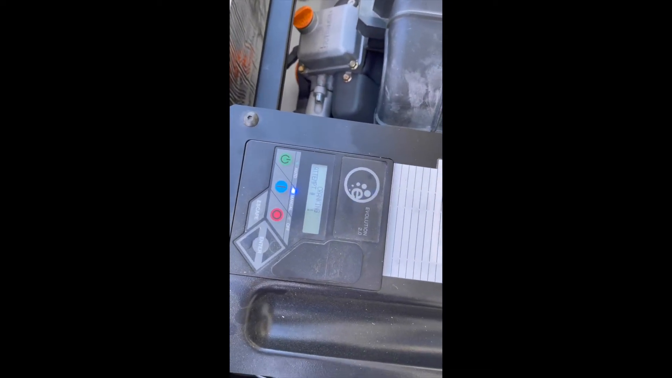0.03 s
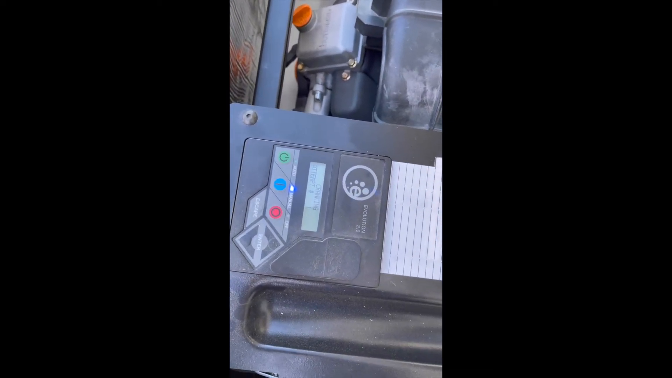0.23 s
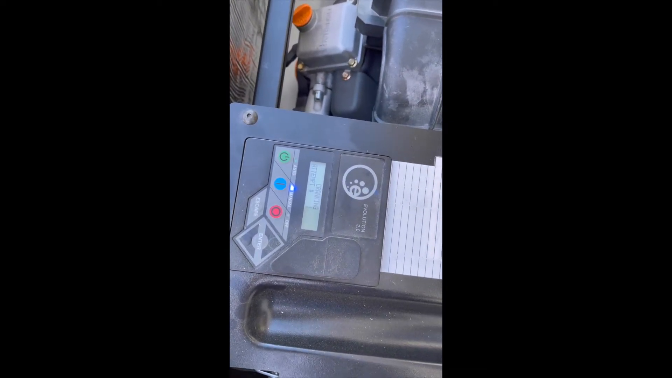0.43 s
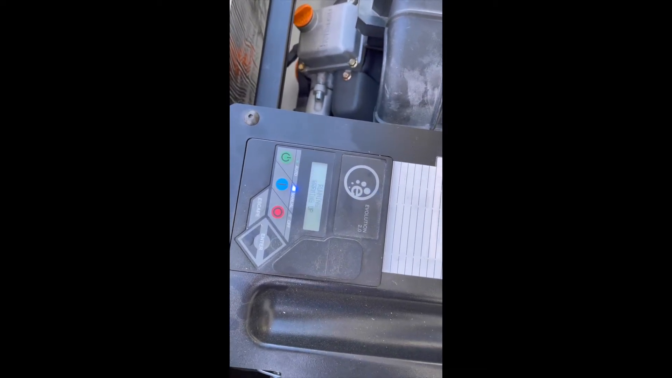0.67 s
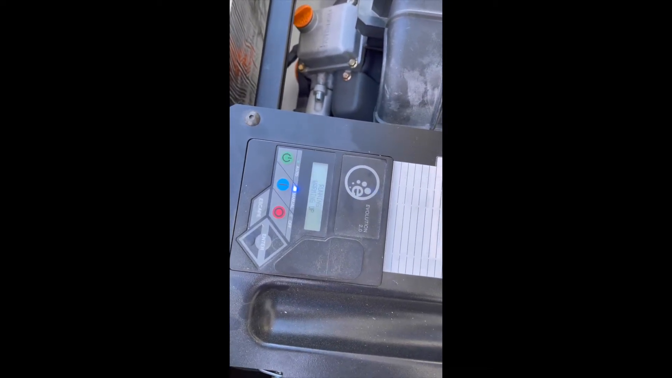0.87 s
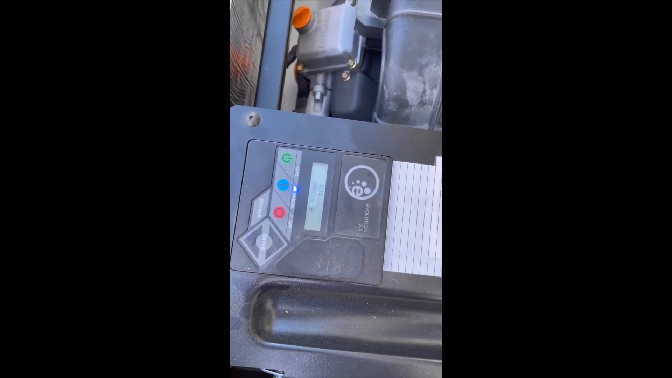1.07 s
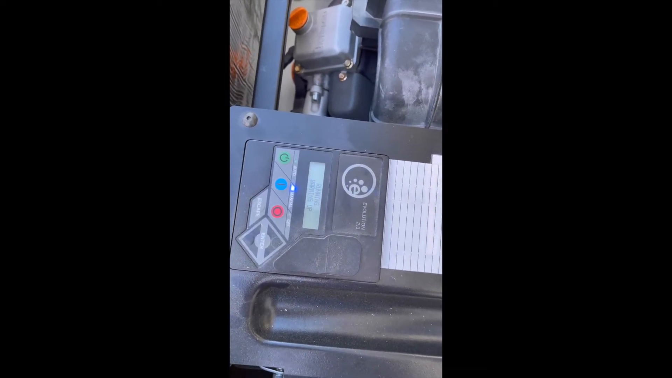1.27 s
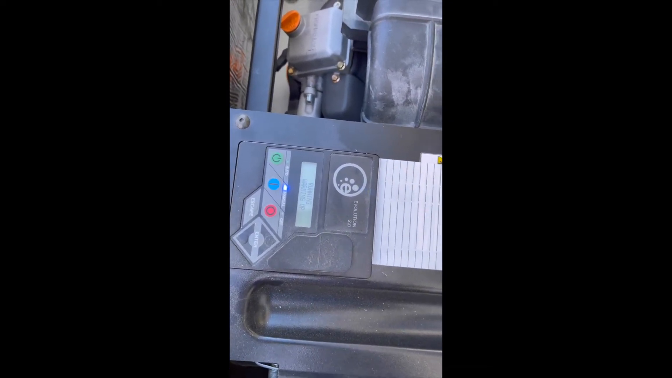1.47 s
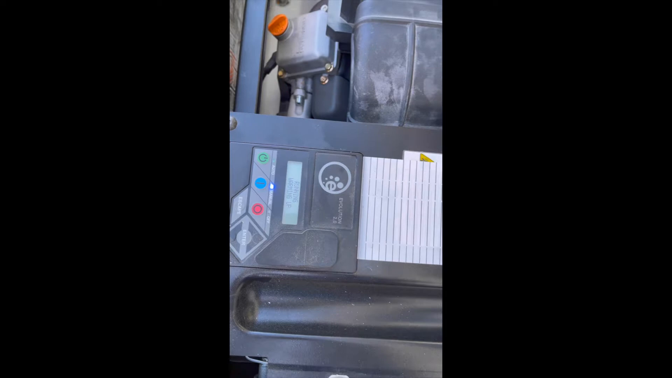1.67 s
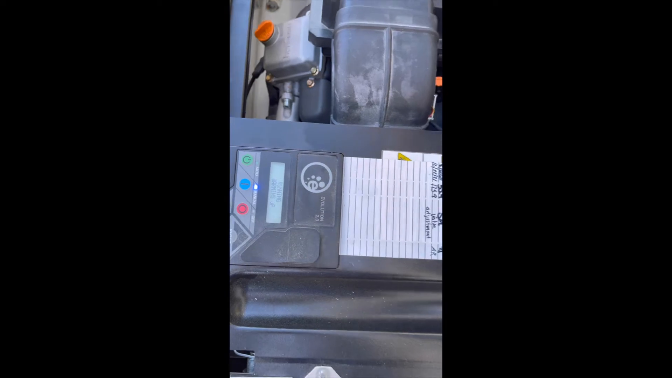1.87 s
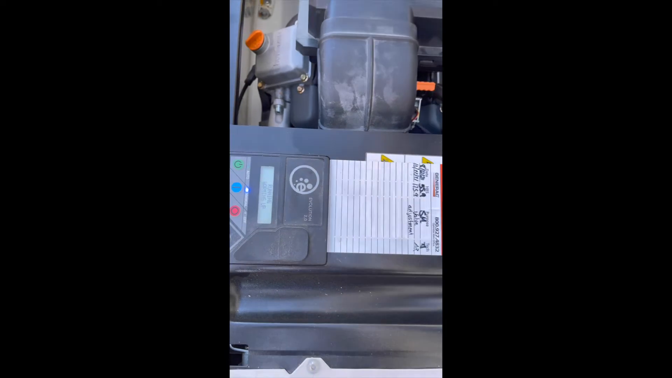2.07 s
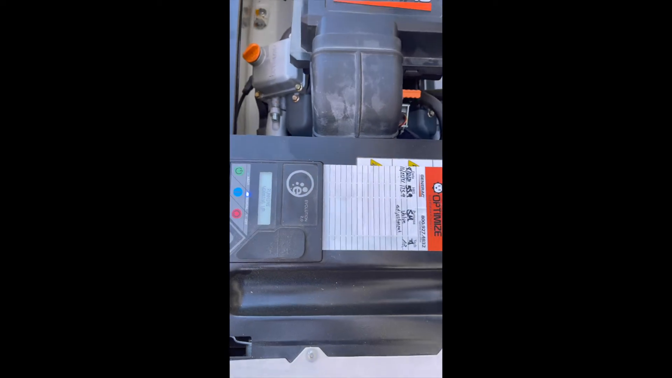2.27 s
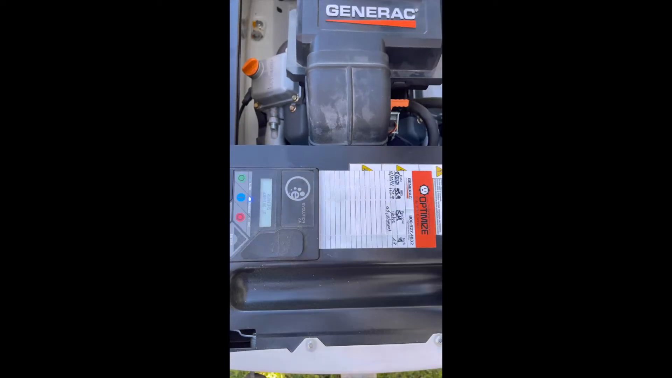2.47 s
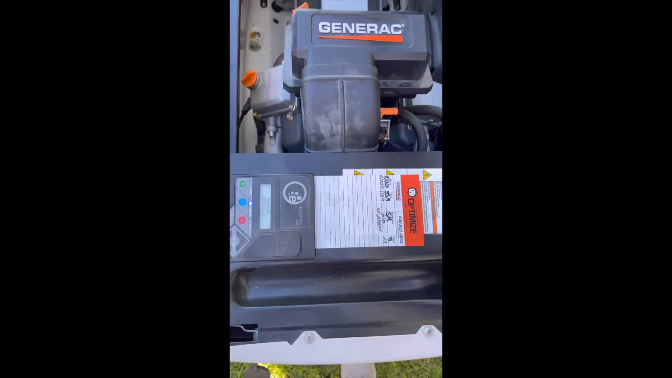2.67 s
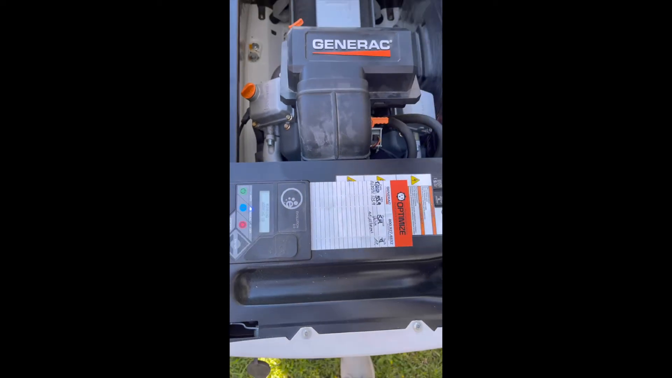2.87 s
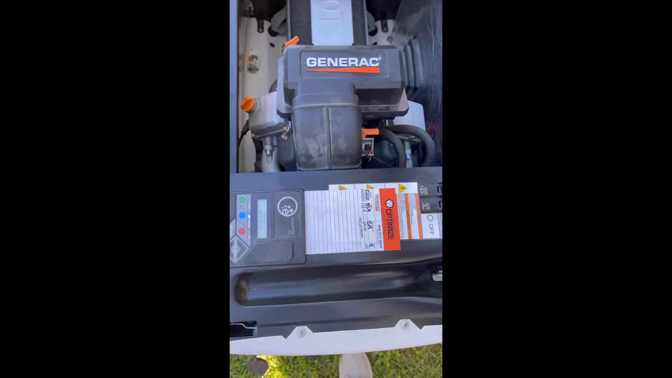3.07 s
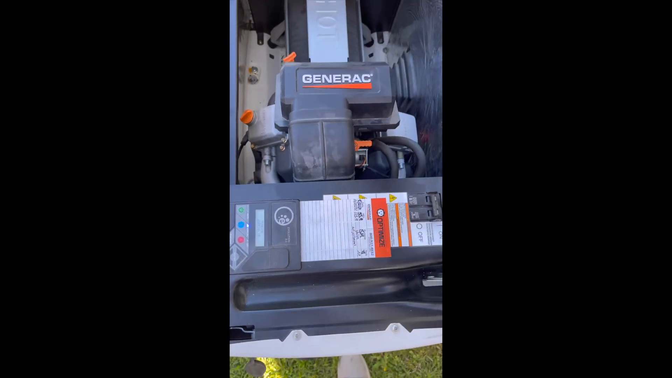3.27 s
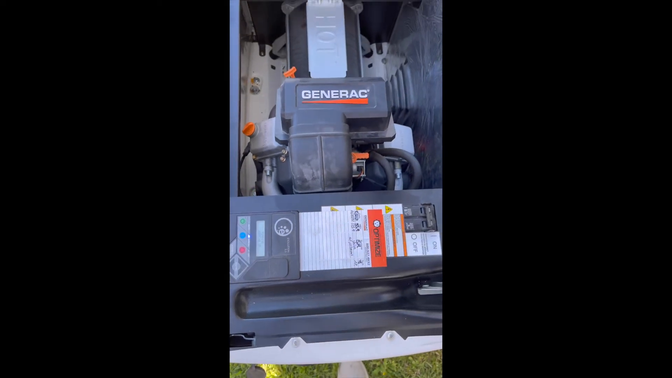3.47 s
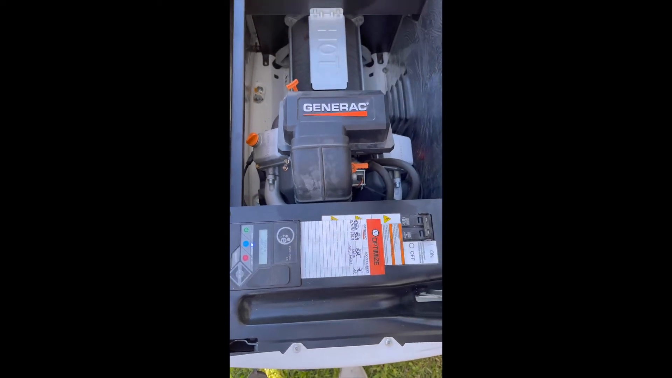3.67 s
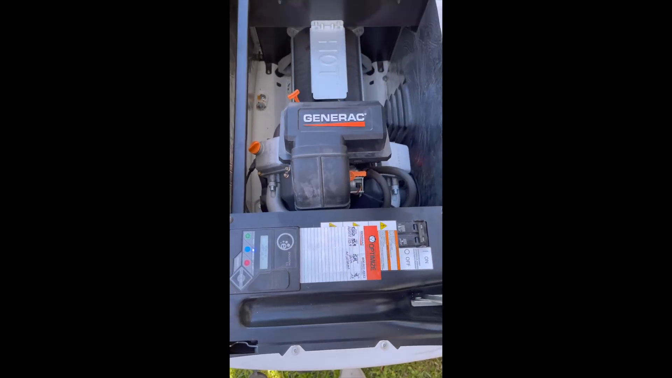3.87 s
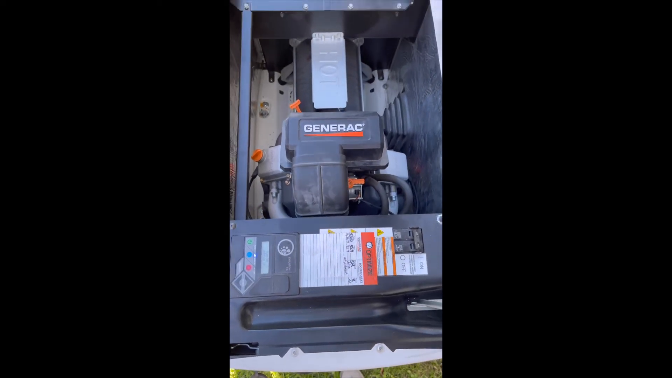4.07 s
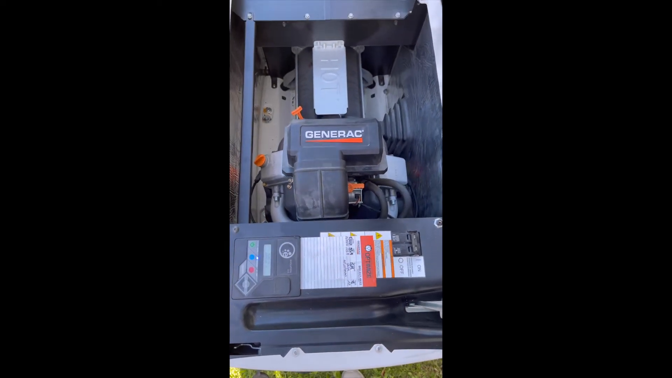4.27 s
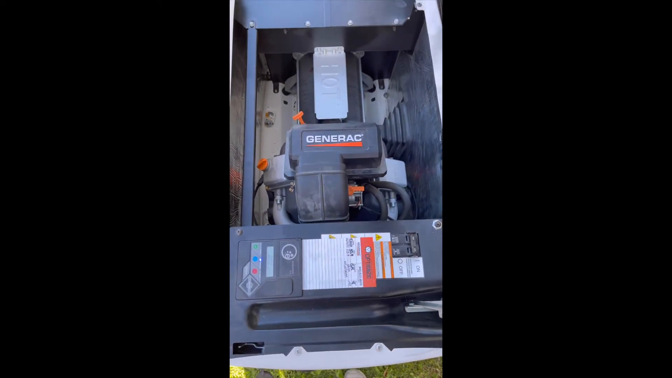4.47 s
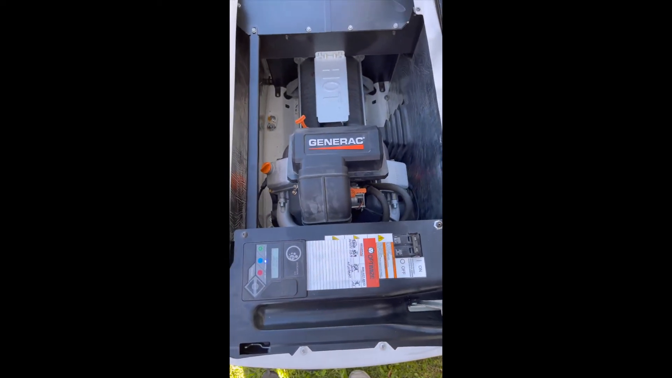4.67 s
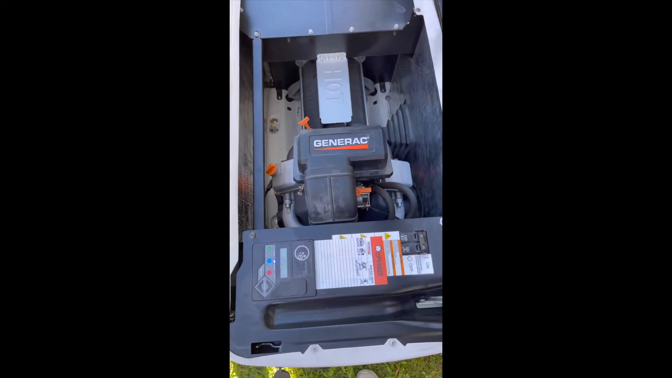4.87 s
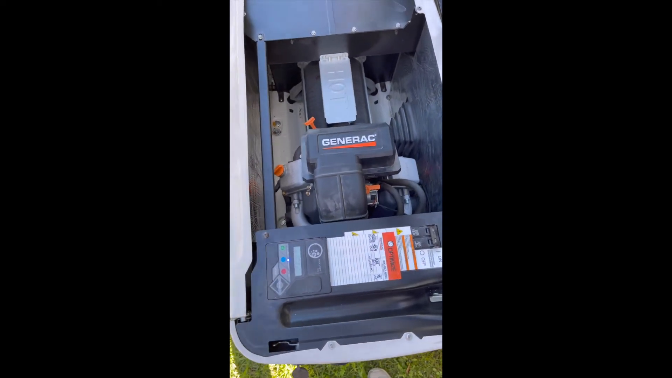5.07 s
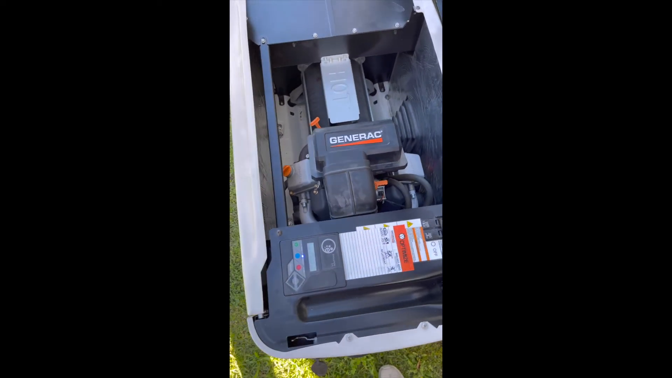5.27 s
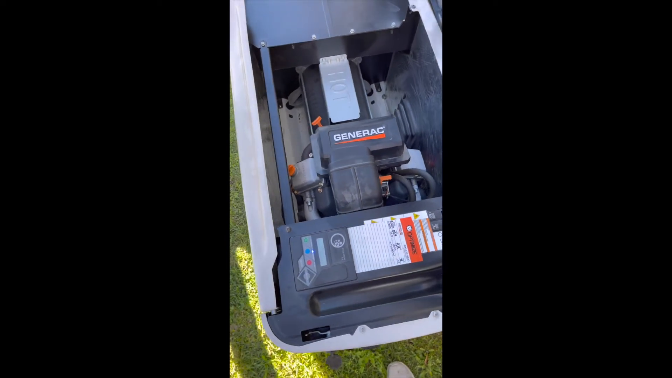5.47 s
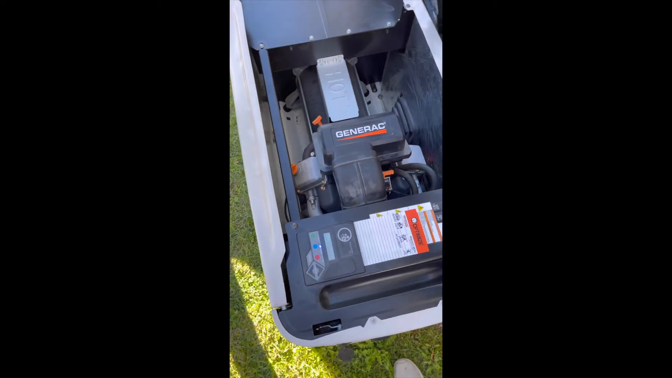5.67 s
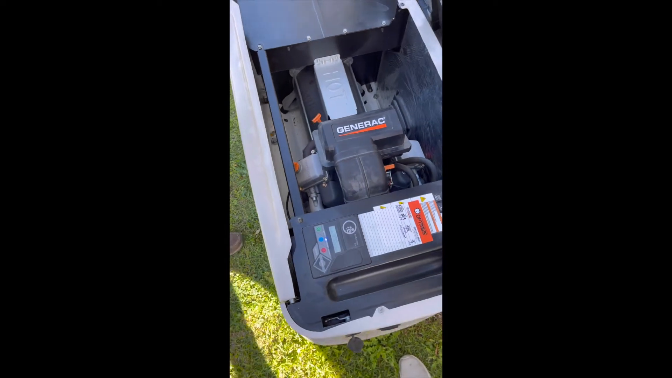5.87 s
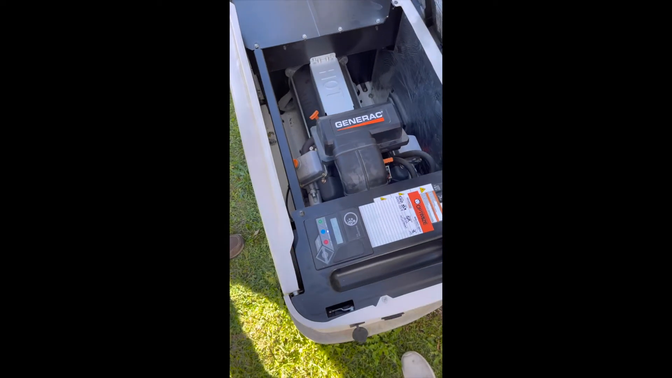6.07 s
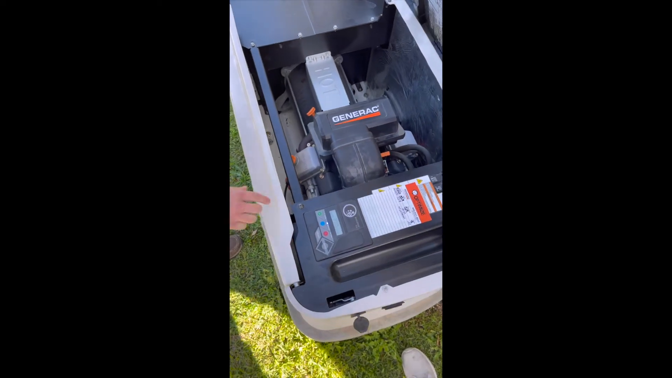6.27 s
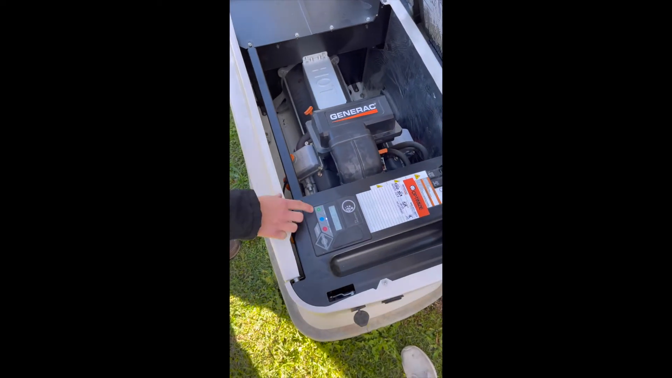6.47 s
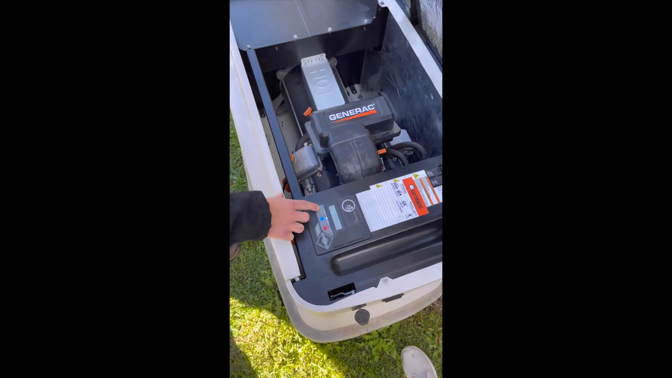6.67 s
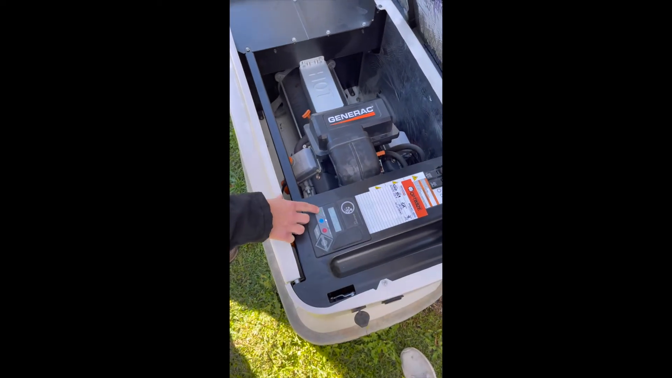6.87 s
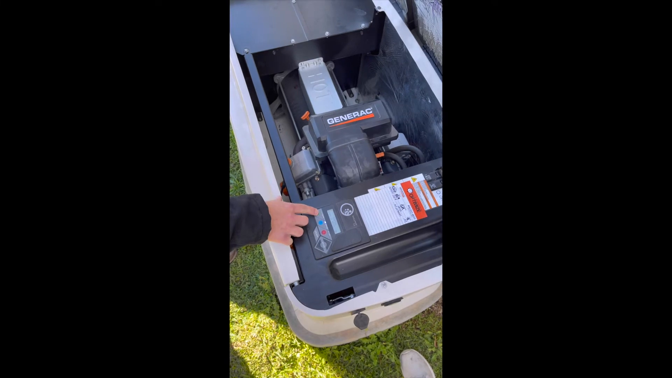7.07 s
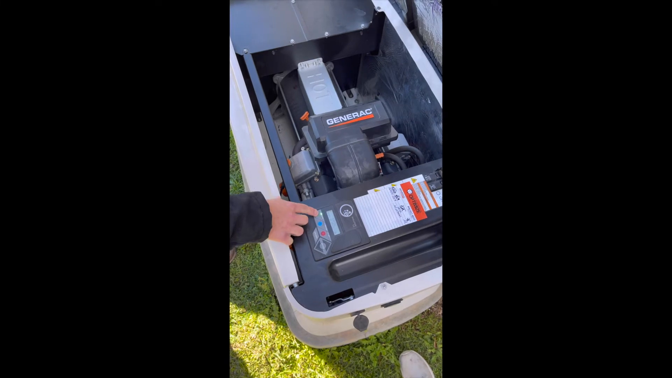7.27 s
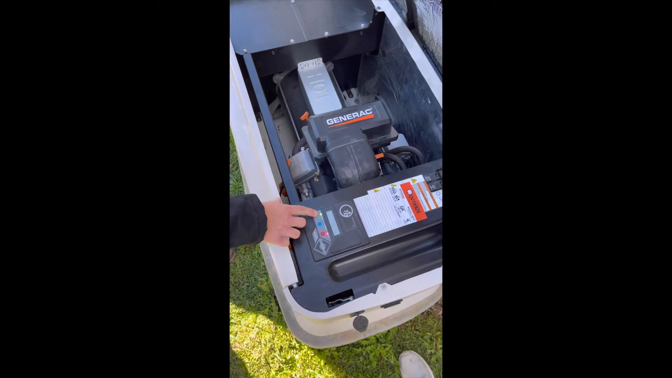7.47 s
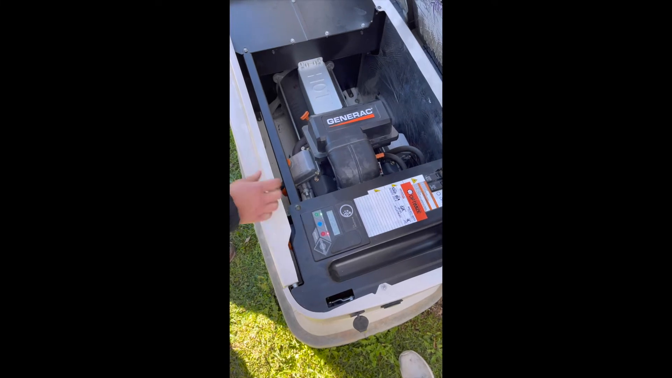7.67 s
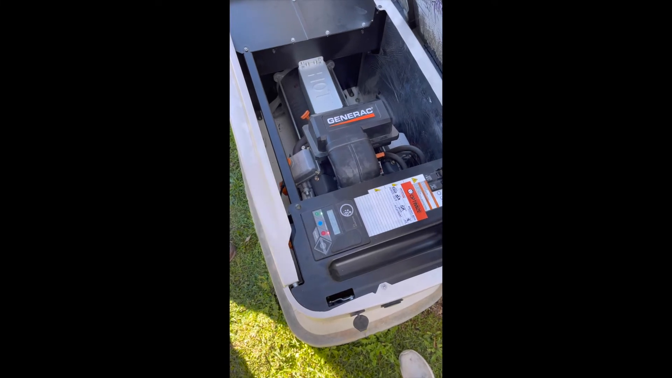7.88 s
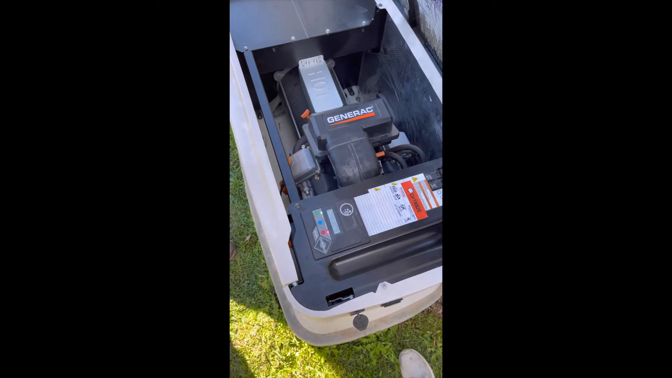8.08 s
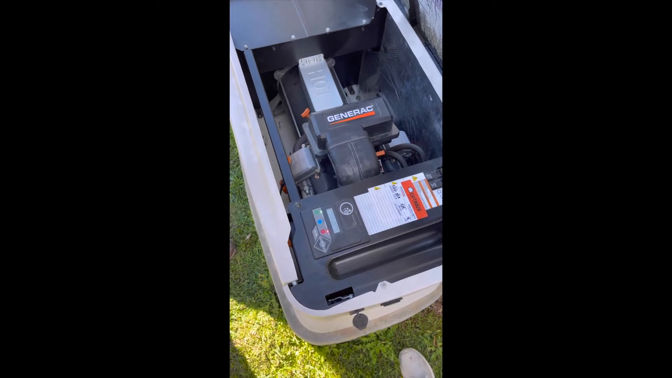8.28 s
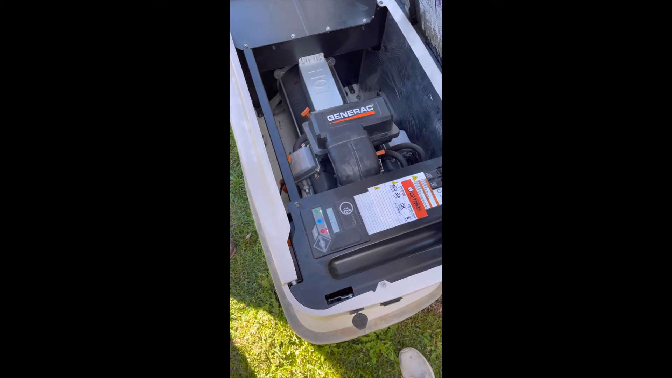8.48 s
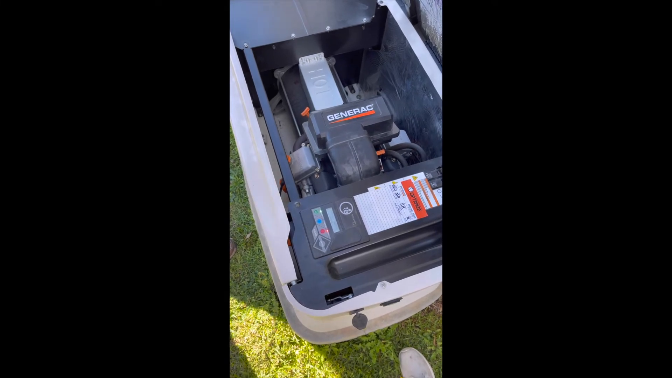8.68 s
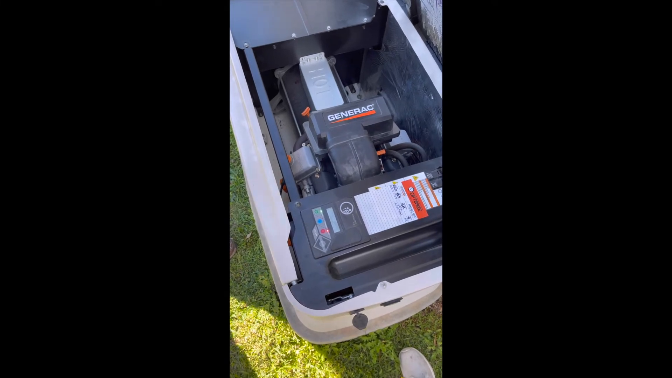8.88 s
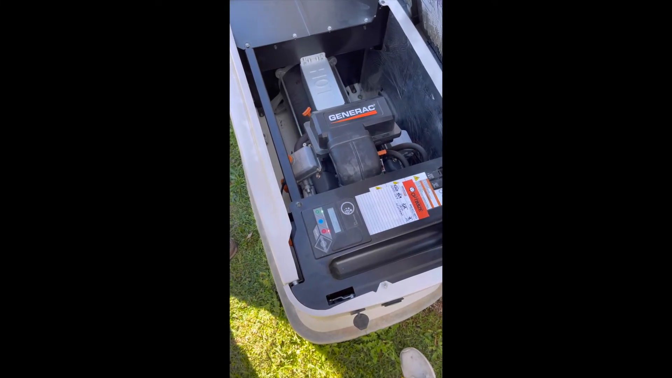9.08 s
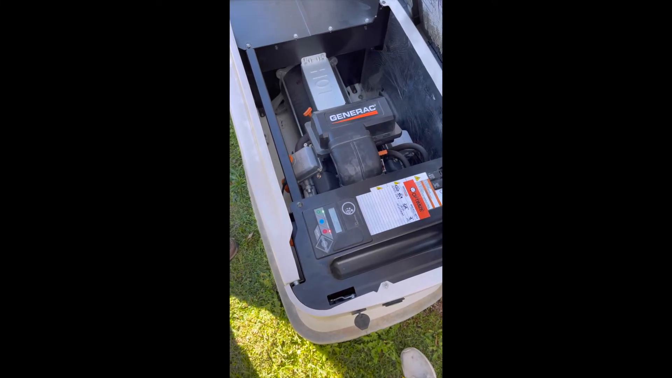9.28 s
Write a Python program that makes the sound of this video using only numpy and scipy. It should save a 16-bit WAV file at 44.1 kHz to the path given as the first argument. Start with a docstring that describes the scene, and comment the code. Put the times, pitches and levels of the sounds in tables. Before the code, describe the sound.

A small generator engine, already firing, speeds up inside an open steel box outdoors and settles into a steady drone. Rushing air roars and hisses around it, with a thin fan whine and rapid metallic valve ticks. The handheld microphone starts close and backs away, so the ticking softens. Near the end the engine is switched off and coasts, falling in pitch and fading with a low chug.

```python
"""An air-cooled twin engine in an open steel box on a lawn runs up to speed, is switched off, coasts down.
Firings and shaking panels drone on multiples of the four-stroke cycle, swelling through the box's
resonances. Air and exhaust roar in the box, the flywheel fan sings, valves tick and ring the head,
and the cowl hisses. We hear it from a handheld pair of microphone ports that backs away as it runs."""
import sys
import numpy as np
from scipy import signal
from scipy.fft import rfft, irfft
from scipy.io import wavfile
from scipy.ndimage import uniform_filter1d

SR = 44100
rng = np.random.default_rng(int(sys.argv[2]) if len(sys.argv) > 2 else 0)


def generate_wav(signal):
    """Clip the signal to [-1, 1] and save it as 16-bit WAV at the path in sys.argv[1]."""
    frames = np.transpose(np.atleast_2d(signal))
    scaled = np.clip(frames, -1, 1) * 32767
    pcm = np.round(scaled).astype(np.int16)
    wavfile.write(sys.argv[1], SR, pcm)


N = 411012
T = np.arange(N) / SR
HZ = np.fft.rfftfreq(N, 1 / SR)

# Levels are relative trims. A set of three means near, far (after backing away) and coasting.
BACK_AWAY_S = (1.0, 4.57)
START_HZ, GOVERNED_HZ, RUN_UP_S = 21.3, 30.137, 1.776  # cycle rates: half the shaft speed
OFF_S, COAST_S = 7.472, 2.49  # switch-off, time constant of the run-down
FIRING_DIES_S, SETTLE_S = .11, .86  # after switch-off: firings stop, moving parts settle


def engine_speed():
    """Cycles a second: the governor pulls the engine up, hunting a little; switched off, it runs down."""
    run_s = np.minimum(T, OFF_S)
    hunt = .15 * np.exp(-run_s / 3) * np.sin(2 * np.pi * run_s / 2.5)
    running = GOVERNED_HZ - (GOVERNED_HZ - START_HZ) * np.exp(-run_s / RUN_UP_S) + hunt
    return running * np.exp(-(T - run_s) / COAST_S)


# Body of the drone, and thin whines above it: (cycle multiple, near [dB], far [dB], coasting [dB])
DRONE_PARTIALS = [(2, -42, -40, -45), (3, -40, -39, -31.5), (4, -39, -40, -48), (5, -31, -43, -34),
                  (6, -29, -41, -42), (7, -42, -43, -48), (8, -31, -31, -39), (9, -40, -34, -45),
                  (10, -38, -35.5, -39), (11, -29, -44, -44), (12, -44, -36, -43), (13, -29.5, -45, -41),
                  (14, -33, -31, -51), (15, -39, -41, -48), (16, -28, -31, -37), (17, -40, -41, -52),
                  (18, -36, -38, -47), (19, -38, -40, -49), (20, -38, -36.5, -43), (22, -48, -42, -51),
                  (24, -38, -38, -41), (25, -45, -41, -52), (26, -42, -43, -56), (28, -42, -44, -48),
                  (30, -48, -39, -47), (32, -39, -46, -41), (36, -47, -45, -60), (38, -48, -47, -50)]
WHINE_PARTIALS = [(44, -50, -48, -54), (64, -50, -51, -52), (72, -48, -47, -54), (80, -46.5, -53, -56)]


def engine_drone(cycle, cycle_hz):
    """Firings and shaking panels. No two firings are alike, so partials waver, the higher ones more."""
    slowing = np.exp(-1.5 * np.maximum(T - OFF_S, 0) / COAST_S)  # falls as speed to the power 1.5
    drone = 0
    for k, *levels_db in DRONE_PARTIALS + WHINE_PARTIALS:
        waver_db = min(.05 * k, .4 + .025 * k) * walk(3) + min(.07 * k, 1.2) * walk(18)
        level = state_gain(levels_db, FIRING_DIES_S) * slowing * box_gain(k * cycle_hz) * undb(waver_db)
        if k * START_HZ < 120:  # the low end builds as the engine catches
            level *= undb(-16 * np.clip(1 - T / .5, 0, 1))
        phase = 2 * np.pi * (k * cycle + rng.random()) + min(.025 * k, .45) * walk(5)
        drone += np.sqrt(2) * level * np.sin(phase)
    # the drone dips as the listener drifts aside
    aside_db = np.interp(T, [5.8, 6.8, OFF_S, OFF_S + FIRING_DIES_S], [0, -1.8, -1.8, 0])
    return drone * undb(aside_db)


# Colour of the steel box: (frequency [Hz], gain [dB])
BOX_RESONANCES = [(40, -13), (55, -4), (70, -3), (115, -4), (150, 4), (171, 8), (180, 3), (210, -1),
                  (225, 6), (260, -10), (290, 6), (345, -3), (372, -8), (420, 2), (445, 6.5), (470, 4),
                  (482, -1), (520, -1), (710, 3), (800, -2), (900, 2), (1060, 7), (1110, -1), (1187, -3),
                  (1200, 5), (1230, 0)]


def box_gain(tone_hz):
    """A gliding partial swells through the box's resonances; coasting, it chugs as it passes the boom."""
    box_hz, box_db = np.transpose(BOX_RESONANCES)
    colour_db = np.interp(np.log(tone_hz), np.log(box_hz), box_db, right=0)
    coasting = np.clip((T - OFF_S) / SETTLE_S, 0, 1)
    chug_db = 5 * np.exp(-((tone_hz - 218) / 30) ** 2) * coasting
    return undb(colour_db + chug_db)


# Fader ride of the rushing air, shared with the cowl hiss: (time [s], level [dB])
AIR_RIDE = [(0, -23.5), (.4, -21.5), (2.8, -22), (3.5, -22.5), (5.1, -20), (5.8, -22.5), (6.6, -22),
            (7.45, -22), (8.3, -28.5), (8.8, -28.5), (9.32, -32)]
# Tone colour of the roar: (frequency [Hz], level [dB])
ROAR_EQ = [(45, -24), (90, -12.5), (140, -20), (200, -1.5), (300, -5.5), (480, -0.5), (700, -3), (1000, -6),
           (1250, -9.5), (1500, -55)]


def box_roar(cycle, cycle_hz):
    """Cooling air and exhaust rush in the box over a boom that outlasts them. Two unrelated streams."""
    flicker_db = .4 * walk(9)
    boom = shape(rng.standard_normal((2, N)), resonance(hz=223.5, width_hz=171))
    rush = shape(knocking_noise(cycle, cycle_hz, share=.15), eq_curve(ROAR_EQ))
    rush_level = state_gain((.5, -.5, -.5)) * undb(ride(AIR_RIDE) + flicker_db)
    return rush_level * rush + state_gain((-25, -33.5, -30.5)) * boom


def knocking_noise(cycle, cycle_hz, share):
    """Two noise streams; a share of their power is knock that returns each cycle and slowly changes."""
    steps, turn_likeness, cycle_likeness = 512, .5, .65
    fresh = rng.standard_normal((2, int(cycle[-1]) + 2, steps))
    other_turn = np.roll(fresh, steps // 2, axis=2)  # the shaft turns twice a cycle
    pattern = (fresh + turn_likeness * other_turn) / np.hypot(1, turn_likeness)
    pattern = signal.lfilter([np.sqrt(1 - cycle_likeness ** 2)], [1, -cycle_likeness], pattern, axis=1)
    knock = np.array([np.interp(cycle * steps, np.arange(row.size), row.ravel()) for row in pattern])
    knock *= np.sqrt(steps * cycle_hz / SR)
    return np.sqrt(share) * knock + np.sqrt(1 - share) * rng.standard_normal((2, N))


# Fader ride of the fan's note: (time [s], level [dB])
FAN_RIDE = [(0, -33), (.3, -29.5), (.8, -32), (1.2, -27.5), (1.9, -26.5), (2.3, -32), (2.8, -36),
            (3.1, -31.5), (3.9, -33), (5.2, -36.5), (5.9, -32), (6.3, -27.5), (7.45, -28), (7.6, -33),
            (7.8, -31), (7.9, -36), (8.0, -34), (8.1, -46), (8.3, -43), (8.8, -48), (8.87, -36),
            (8.94, -37), (9.0, -46), (9.25, -42), (9.32, -44)]


def flywheel_fan(cycle):
    """Twenty blades pass forty times a cycle and sing one slightly shivering note."""
    level = undb(ride(FAN_RIDE) + 1.1 * walk(20))
    return np.sqrt(2) * level * np.sin(2 * np.pi * 40 * cycle + .6 * walk(9))


# Where the valves seat: (position in the cycle [0-1])
VALVE_SEATS = [.325, .67, .98]
# Metal rings of the head and covers: (frequency [Hz], width [Hz], blow 1 [dB], blow 2 [dB], blow 3 [dB],
# loose rattle [gain], near [dB], far [dB], coasting [dB])
HEAD_RINGS = [(1950, 130, -2, 6, -4, .2, -35, -41.5, -50), (2303, 150, -2, 0, -2, .2, -38, -45, -59),
              (3130, 140, 8, 2, -6, .1, -39, -52, -49), (3380, 170, 1, 7, -3, .07, -53, -53, -44.5),
              (3850, 160, -3, 0, 4, .1, -48, -55, -47), (4274, 74, 2, -4, 1, .05, -50, -53, -44),
              (5680, 130, 3, 0, 1, .1, -39, -51, -50), (6600, 330, 5, 2, 11, .1, -47, -50, -43.5),
              (7080, 650, 18, 17, 3, .05, -33.5, -67, -44.5), (8500, 230, -3, 2, -8, .1, -49, -62, -40),
              (9000, 30, 0, -3, -8, .8, -50, -74, -60), (10390, 390, 7, -6, -10, .05, -36, -45, -40),
              (10640, 220, 0, -10, -12, .03, -42, -60, -38.5),
              (11180, 400, 3, 4, -8, .35, -29.5, -42.5, -60), (12180, 300, 10, 4, -6, .12, -39.5, -64, -65)]


def valve_ticks(cycle, cycle_hz):
    """Three short blows a cycle, each much like its last, and a loose rattle ring the head and covers."""
    tick_s, sameness = .0035, .62
    clatter = undb(3 * np.clip(1 - T / .9, 0, 1))  # harder as the engine catches
    rattle, blows = rng.standard_normal(N), []
    for seat in VALVE_SEATS:
        count = cycle - seat + 1
        since_s = (count % 1) / cycle_hz
        repeating = rng.standard_normal((2, SR // 10))[:, (since_s * SR).astype(int)]
        strength = clatter * undb(1.2 * rng.standard_normal(400))[count.astype(int)]
        grain = sameness * repeating + (1 - sameness) * rattle
        blows.append(strength * np.exp(-since_s / tick_s) * grain)
    ticks = 0
    for hz, width_hz, *voicing in HEAD_RINGS:
        blow_db, looseness, levels_db = voicing[:3], voicing[3], voicing[4:]
        force = np.tensordot(undb(blow_db), blows, 1) + looseness * rattle
        # the lower rings take their coasting level late
        level = state_gain(levels_db, glide_s=.375, wait_s=.75) if hz < 5000 else state_gain(levels_db)
        ticks += level * undb(.8 * walk(15)) * shape(force, resonance(hz, width_hz))
    return ticks


# Tone colour of the hiss and of the sizzle on top: (frequency [Hz], level [dB])
HISS_EQ = [(1200, 2), (1700, 0.5), (2300, 1.5), (2800, -1), (3200, -1), (3800, -3), (5100, -5.5),
           (5600, -13), (6200, -27)]
SIZZLE_EQ = [(4800, -22), (5500, -3), (6300, -3), (7000, -2), (8300, -3), (9000, -2), (9700, -2),
             (10800, 1), (11500, -2), (11950, -8), (12800, -13), (13500, -17), (14200, -27), (14900, -36)]


def cowl_hiss(cycle, cycle_hz):
    """Air rushes through the cowl; its top end breathes with the cycle. Two unrelated streams."""
    air_db = ride(AIR_RIDE)
    depth_db = np.interp(T, [*BACK_AWAY_S, OFF_S, OFF_S + SETTLE_S], [1.5, 1, 1, 2])
    throb_db = depth_db * np.cos(2 * np.pi * (cycle - .45))
    hiss_level = state_gain((-5, -4.5, -6)) * undb(air_db + .5 * walk(20))
    hiss = shape(knocking_noise(cycle, cycle_hz, share=.35), eq_curve(HISS_EQ))
    sizzle_level = state_gain((-3, -6.5, -8)) * undb(air_db + throb_db + .6 * walk(30))
    sizzle = shape(rng.standard_normal((2, N)), eq_curve(SIZZLE_EQ))
    return hiss_level * hiss + sizzle_level * sizzle


def undb(db):
    """Decibels to gain."""
    return 10 ** (np.asarray(db) / 20)


def ride(table):
    """A fader ride in dB at every sample."""
    return np.interp(T, *np.transpose(table))


def state_gain(db, glide_s=SETTLE_S, wait_s=0):
    """A gain that glides from near to far, and after switch-off to coasting."""
    near, far, coasting = db
    times = [*BACK_AWAY_S, OFF_S + wait_s, OFF_S + wait_s + glide_s]
    return undb(np.interp(T, times, [near, far, far, coasting]))


def walk(rate):
    """Random levels held 1 / rate seconds and smoothed twice; spread near 1."""
    hold = int(SR / rate)
    levels = np.repeat(rng.standard_normal(N // hold + 1), hold)
    return 1.79 * uniform_filter1d(uniform_filter1d(levels, hold), hold)[:N]


def eq_curve(table):
    """A gain for every frequency, drawn through the table's points."""
    hz, db = np.transpose(table)
    return undb(np.interp(np.log(HZ + 1), np.log(hz), db, left=-90, right=-90))


def resonance(hz, width_hz):
    """A resonant peak with steep skirts."""
    return (1 + .64j * (HZ / hz - hz / (HZ + 1)) * hz / width_hz) ** -2


def shape(sound, gain):
    """Filter by a gain for every frequency, then scale to rms 1."""
    filtered = irfft(rfft(sound) * gain, N)
    return filtered / np.sqrt(np.mean(filtered ** 2))


# Focused bass, diffuse treble with a few tightly linked bands: (frequency [Hz], likeness [0-1])
STEREO_LIKENESS = [(170, .998), (300, .955), (860, .95), (1250, .99), (1750, .993), (2000, .85),
                   (2400, .52), (2900, .37), (4000, .55), (4500, .2), (5000, .6), (5500, .76), (5800, .999),
                   (6300, .999), (6600, .8), (8100, .76), (8450, .999), (9700, .999), (10000, .85),
                   (11700, .83), (11950, .98)]


def spread(streams, width_db):
    """One stream feeds both channels alike, the other with opposite sign; up close the image is wider."""
    alike = np.interp(HZ, *np.transpose(STEREO_LIKENESS))
    mid, side = irfft(rfft(streams) * np.sqrt([(1 + alike) / 2, (1 - alike) / 2]), N)
    side *= state_gain(width_db)
    return np.array([mid + side, mid - side])


def scene():
    """Lock every layer to the engine's cycle and mix in stereo."""
    cycle_hz = engine_speed()
    wander = .005 * walk(2.5)  # uneven firings push the shaft ahead and behind
    cycle = np.maximum(np.cumsum(cycle_hz) / SR + wander, 0)
    body = spread(box_roar(cycle, cycle_hz), width_db=(3, -1, -5)) + engine_drone(cycle, cycle_hz)
    # left minus right: the listener turns towards the engine, then drifts
    pan_db = np.interp(T, (2.8, 4.4, 6.5), (-1.55, .25, -.3))
    body *= undb(np.array([pan_db, -pan_db]) / 2)
    fan = flywheel_fan(cycle)
    treble = cowl_hiss(cycle, cycle_hz) + valve_ticks(cycle, cycle_hz)
    return body + fan + spread(treble, width_db=(3, -1, .5))


# Treble offset, opposed near 9 kHz, centred above 12 kHz: (frequency [Hz], left minus right phase [rad])
STEREO_PHASE = [(0, 0), (1900, .1), (4300, .4), (4900, -2.3), (5500, -.6), (5800, 0), (6300, 0),
                (8450, np.pi), (9700, np.pi), (10200, 3.9), (11900, 5.9), (12000, 2 * np.pi)]
# The hand's shadow on the left port: (frequency [Hz], gain [dB])
HAND_SHADOW = [(3600, 0), (4500, -2), (5000, -4), (5500, -.5), (5800, 0)]


def record(dry):
    """The treble is phase-offset between channels, a hand shades the left, and the very top is cut."""
    phase = np.interp(HZ, *np.transpose(STEREO_PHASE))
    spectra = rfft(dry) * np.exp(.5j * np.outer([1, -1], phase))
    spectra[0] *= undb(np.interp(HZ, *np.transpose(HAND_SHADOW)))
    high_cut = signal.ellip(10, .2, 70, 15700, fs=SR, output="sos")
    return signal.sosfilt(high_cut, irfft(spectra, N))


dry = scene()
out = record(dry)
generate_wav(out)
```